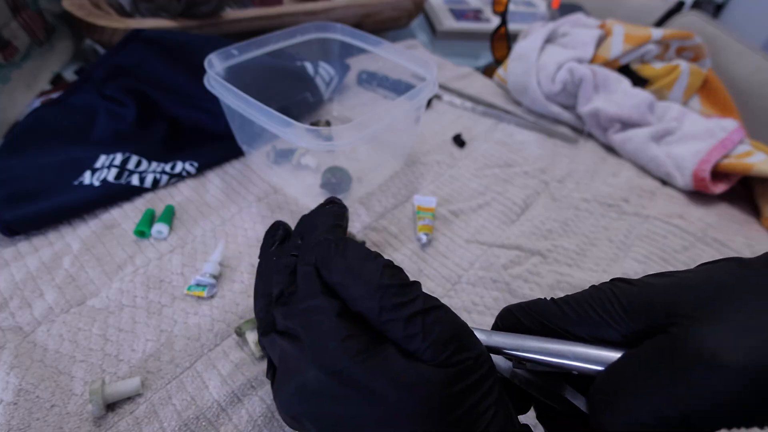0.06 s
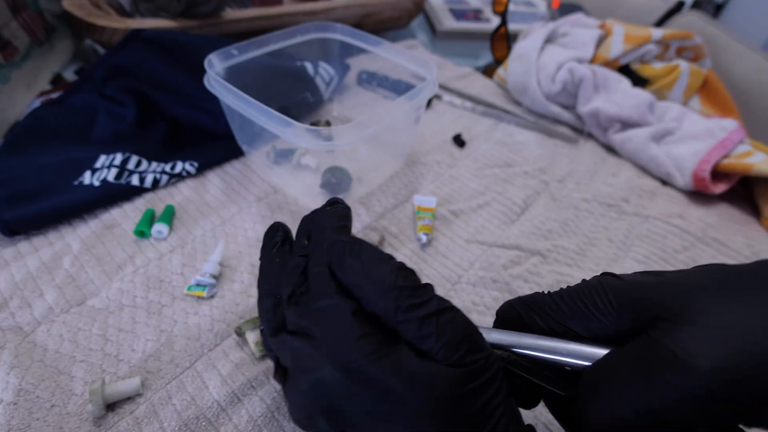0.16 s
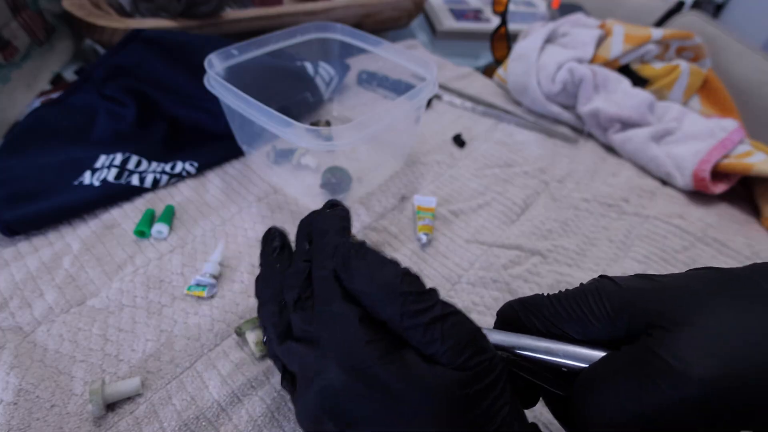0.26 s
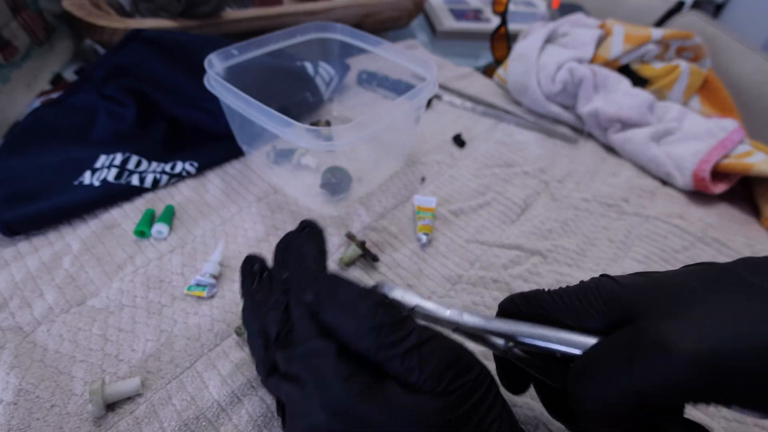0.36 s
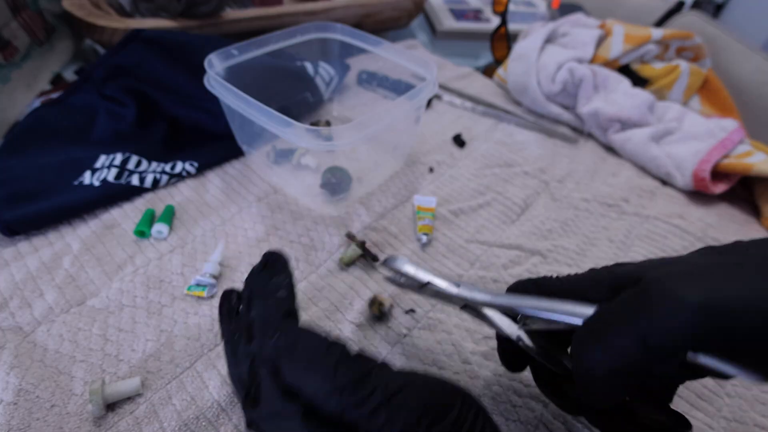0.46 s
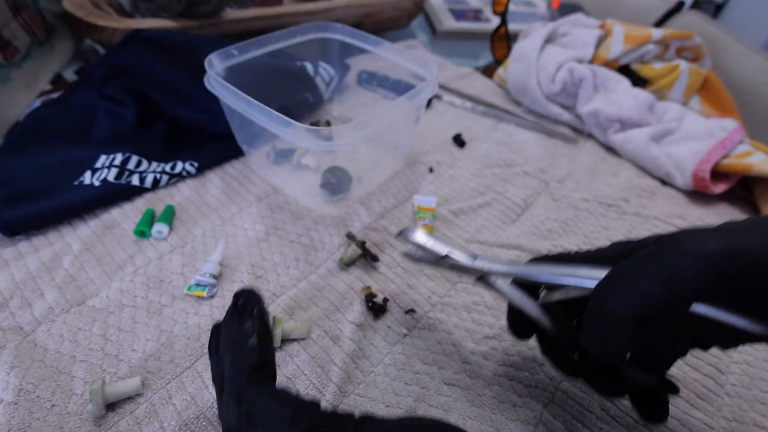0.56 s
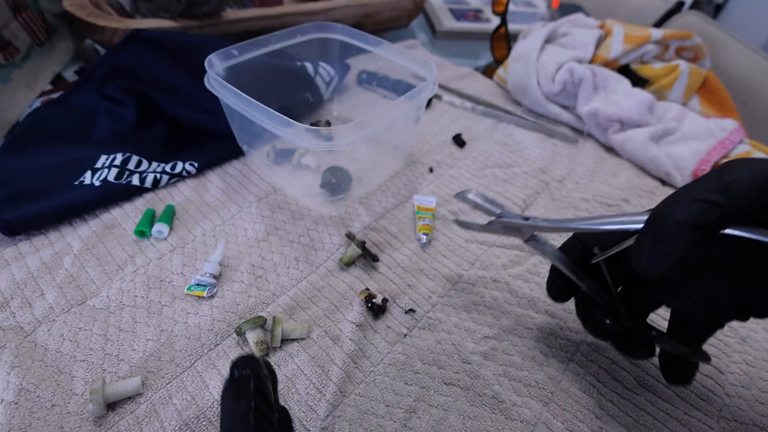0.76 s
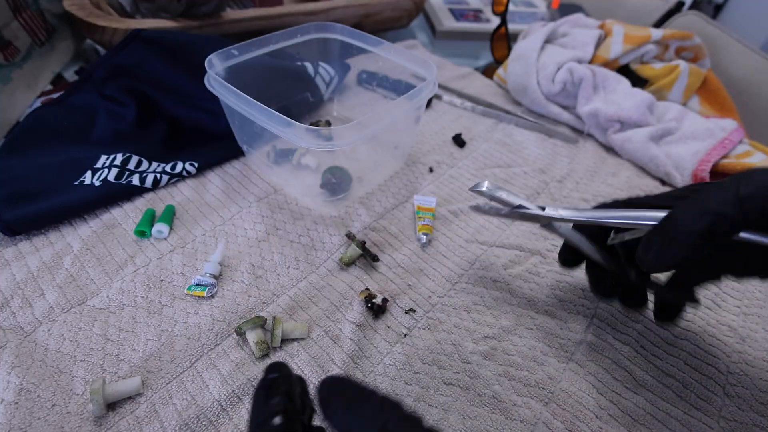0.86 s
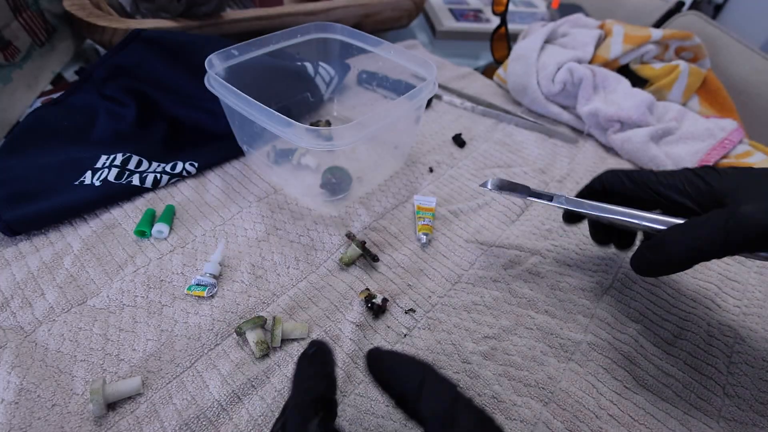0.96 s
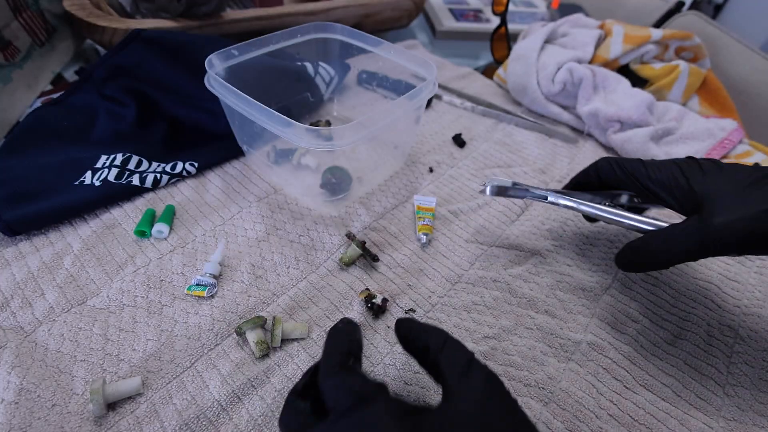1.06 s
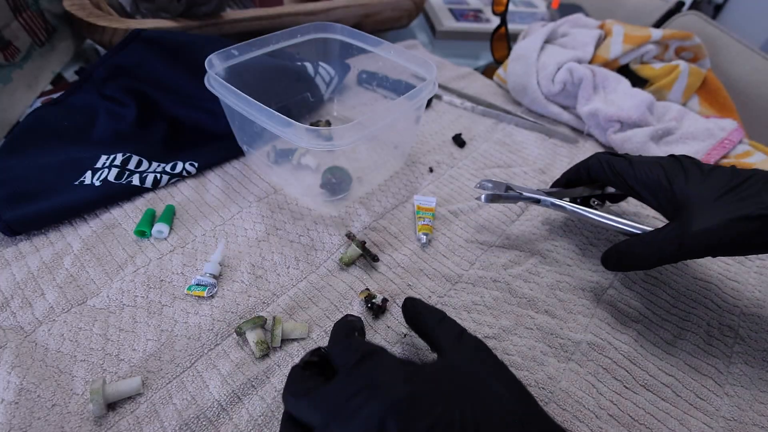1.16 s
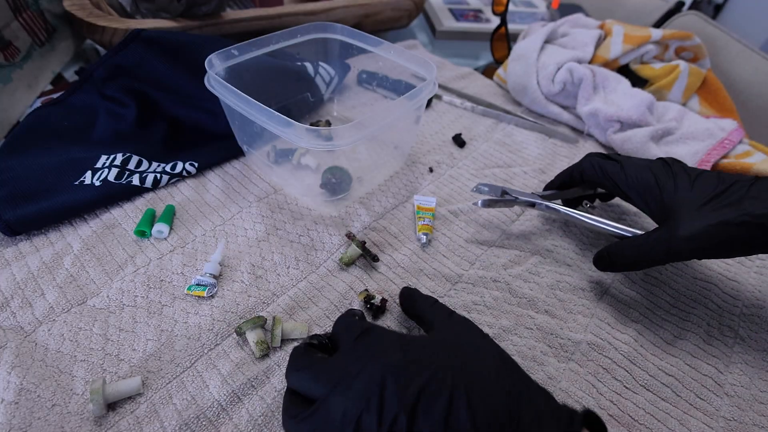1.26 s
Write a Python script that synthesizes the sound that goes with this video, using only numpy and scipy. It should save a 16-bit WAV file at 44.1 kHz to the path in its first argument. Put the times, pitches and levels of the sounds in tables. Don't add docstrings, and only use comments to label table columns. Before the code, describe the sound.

A single loud, brittle snap at 0.24 s: steel cutters split a small rock in a tight burst of gritty fractures, with a faint table thud, thin steely ringing and a short room answer. Before it, a faint tick at 0.04 s and soft rubbing. Jaws click at 0.44 s; tiny crumb and glove ticks, cloth rustle, a fading distant trickle and low room hum follow, with a last tick at 1.24 s.

```python
import sys
import numpy as np
from scipy import signal
from scipy.fft import rfft, irfft
from scipy.io import wavfile
from scipy.ndimage import uniform_filter1d

SR = 44100
rng = np.random.default_rng(int(sys.argv[2]) if len(sys.argv) > 2 else 0)


def to_wav(s):
    ch = np.atleast_2d(s).T
    pcm = np.round(np.clip(ch, -1, 1) * 32767)
    wavfile.write(sys.argv[1], SR, pcm.astype(np.int16))


def volts_from_decibels(level):
    exponent = np.asarray(level, float) / 20
    return 10 ** exponent


N = 57330
T = np.arange(N) / SR

# start in seconds, level in dB, extra treble above 6 kHz in dB.
FRACTURES = [
    (.2405, -16, -16),
    (.2422, -16, -4),
    (.2429, -15, -2),
    (.2442, -24, 0),
    (.2453, -24, 9),
    (.2466, -17, 2),
    (.2497, -35, 0),
    (.2533, -36, 0),
    (.2752, -39, 8),
]
# mode in Hz, level in dB, T60 in seconds.
STONE_MODES = [(1090, -12, .025), (1310, -8, .01), (1660, -5, .01), (1830, 1, .011), (2030, -7, .009),
               (2640, -3, .009), (3610, -12, .008), (3950, -9, .01), (4440, -5, .014), (5150, -5, .007),
               (7150, -14, .008), (7880, -7, .008), (8180, -8, .008), (9450, -8, .007)]
# centre in Hz, width in Hz.
STONE_GAPS = [(3150, 650), (6150, 500)]
# centre in Hz, width in Hz, level in dB, T60 in seconds.
HANDLE_BANDS = [(1090, 45, -59, .6), (2590, 170, -51, .6), (4050, 300, -57, .4), (5560, 250, -58, .35),
                (8150, 1100, -52, .25), (9800, 600, -65, .3), (12100, 900, -62, .25)]
# mode in Hz, level in dB, T60 in seconds.
TABLE_MODES = [(85, -49, 0.099), (165, -53.5, 0.16), (350, -49, 0.14), (530, -60.5, 0.014)]
# mode in Hz, level in dB, T60 in seconds.
JAW_MODES = [(2730, -55, .012), (3900, -50, .012), (5560, -47, .016), (6570, -58, .01), (7720, -46, .012),
             (9360, -48, .012), (12200, -60, .016)]
# start in seconds, level in dB, pitch in Hz, T60 in seconds.
TICKS = [(.0426, -51, 1750, .016), (.0430, -58, 3650, .016), (.0435, -60, 4450, .016),
         (.0432, -63, 9000, .012), (.276, -55, 330, .04), (.180, -65, 1800, .012), (.5015, -58, 1900, .012),
         (.502, -62, 4000, .012), (.5415, -58, 1950, .012), (.549, -60, 2100, .012),
         (.5855, -59, 1900, .012), (.607, -64, 2000, .01), (.619, -60, 2400, .014), (.620, -66, 4200, .014),
         (.680, -67, 2200, .01), (.757, -68, 5500, .006), (.806, -68, 7000, .008), (.878, -67, 10500, .008),
         (.921, -64, 6800, .012), (.938, -68, 9500, .012), (.945, -68, 5000, .008), (.965, -65, 6500, .012),
         (.969, -67, 5000, .012), (.966, -68, 3900, .012), (1.2388, -57, 2400, .012),
         (1.239, -67, 4800, .008), (1.239, -67, 8000, .008), (1.272, -66, 6800, .02)]
# time in seconds, pressure in dB.
RUB_PRESSURE = [(0, -80), (.042, -77), (.05, -64.5), (.13, -75), (.24, -75), (.3, -67), (.4, -74),
                (.6, -72.5), (.72, -78), (.745, -65.5), (.83, -68), (.93, -66), (1.0, -70), (1.1, -75.5),
                (1.2, -77.5), (1.29, -68.5)]
# centre in Hz, width in Hz, level in dB.
RUB_BANDS = [(153, 110, -1), (271, 96, 4), (360, 180, -3.5), (531, 100, -3.5), (680, 100, -9),
             (1090, 200, -21), (81, 40, -13.5)]
# time in seconds, level in dB.
RUSTLE_LEVEL = [(0, -114.5), (.04, -105), (.05, -77), (.1, -116), (.205, -116), (.22, -76.5), (.45, -78),
                (.55, -84), (.7, -86), (.8, -86.5), (.96, -77), (1.1, -87), (1.2, -90), (1.27, -83.5)]
# time in seconds, level in dB.
TRICKLE_LEVEL = [(0, -73), (.04, -94), (.06, -71), (.2, -77), (.5, -70), (.68, -77), (.72, -78.5),
                 (1.3, -92)]
# time in seconds, level in dB.
ROOM_CAUSES = [
    (.0426, -27),
    (.2405, 0),
    (.4375, -28),
    (1.2388, -34),
]
# frequency in Hz, level in dB, T60 in seconds.
ROOM_TAIL = [(300, -65, .4), (880, -64, .35), (1200, -56.5, 0.35), (2400, -55, 0.59), (3140, -65, .4),
             (4470, -54.5, 0.6), (6660, -64, 0.44), (14000, -68, 0.25)]
# frequency in Hz, density in dB per Hz.
HUM_SPECTRUM = [(18, -49), (30, -16.5), (327, 6), (888, -1.5), (1420, 0.5), (2230, -12.5), (4520, -26),
                (11300, -27), (16000, -39)]

RISE_S = .0002
CRACK_S = FRACTURES[0][0]
THUD_S = FRACTURES[1][0]
JAWS_S = .4374
SNAP_PEAK = .3
STONE_SCATTER_DB, STONE_DETUNE, STONE_LOW_HZ = 2, .01, 1000
GRIT_DB, GRIT_T60_S, GRIT_HZ = -26, 0.011, 12120
TICK_SPREAD, TICK_DB = .045, -2
RUSTLE_HZ, RUSTLE_WIDTH_HZ, RUSTLE_GRAIN_DB = 7000, 7600, 1.2
TRICKLE_HZ, TRICKLE_WIDTH_HZ = 1490, 1200
ROOM_DELAY_S, ROOM_RISE_S = .006, .003
EARLY_DB, EARLY_T60_S = 9.5, 0.049
TICK_ROOM_DB, TICK_ROOM_T60_S = -40, .12
HUM_DB = -75
LOUD_UNTIL_S, LOUD_FADE_S = .39, .072
QUIET_TOP_HZ, HUM_TOP_HZ = 12700, 9500
MIC_LOW_HZ = 57


def curve(table, x, col=1, log=False):
    a = np.array(table, float)
    if log:
        return np.interp(np.log(x), np.log(a[:, 0]), a[:, col])
    return np.interp(x, a[:, 0], a[:, col])


def ring(start_s, hz, db, t60_s):
    t = np.maximum(T - start_s, 0)
    decay = np.exp(-np.log(1000) * t / max(t60_s, .002))
    push = 1 - np.exp(-(t / RISE_S) ** 2)
    return volts_from_decibels(db) * np.sin(2 * np.pi * hz * t) * decay * push


def band(hz, width_hz):
    f = np.arange(N // 2 + 1) * SR / N + 1e-9
    resonance = 1 / (1 + ((f - hz * hz / f) / width_hz) ** 2)
    y = irfft(rfft(rng.standard_normal(N)) * resonance, N)
    return y / y.std()


def walk(rate_hz):
    k = int(SR / rate_hz)
    w = uniform_filter1d(uniform_filter1d(rng.standard_normal(N), k), k)
    return w / w.std()


def snap():
    out = 0
    grit = band(GRIT_HZ, 6000)
    chance = rng.standard_normal((len(FRACTURES), len(STONE_MODES), 2))
    for (start_s, db, treble_db), luck in zip(FRACTURES, chance):
        for (hz, mode_db, t60_s), (a, b) in zip(STONE_MODES, luck):
            level_db = db - 2.5 + mode_db + treble_db * (hz > 6000) + STONE_SCATTER_DB * a
            out = out + np.sign(b) * ring(start_s, hz * (1 + STONE_DETUNE * b), level_db, t60_s)
        fall_db = 60 * np.maximum(T - start_s, 0) / GRIT_T60_S
        out = out + grit * (T > start_s) * volts_from_decibels(db + treble_db + GRIT_DB - fall_db)
    for hz, width_hz in STONE_GAPS:
        out = signal.lfilter(*signal.iirnotch(hz, hz / width_hz, SR), out)
    out = signal.sosfilt(signal.butter(6, STONE_LOW_HZ, "high", fs=SR, output="sos"), out)
    return out * SNAP_PEAK / np.abs(out).max()


def steel():
    t = T - THUD_S
    out = sum(ring(THUD_S, *mode) for mode in TABLE_MODES)
    for hz, width_hz, db, t60_s in HANDLE_BANDS:
        out = out + band(hz, width_hz) * volts_from_decibels(db - 60 * np.maximum(t, 0) / t60_s) * (t > 0)
    return out


def ticks():
    out = sum(ring(JAWS_S, *mode) for mode in JAW_MODES)
    for (start_s, db, hz, t60_s), luck in zip(TICKS, rng.standard_normal((len(TICKS), 3))):
        for step, c in zip((-1, 0, 1), luck):
            mode_hz = hz * (1 + TICK_SPREAD * (step + c / 3))
            out = out + ring(start_s, mode_hz, db + TICK_DB - 5 * abs(step), t60_s)
    return out


def hands():
    low = sum(volts_from_decibels(db + 0.5 * walk(23)) * band(hz, width_hz) for hz, width_hz, db in RUB_BANDS)
    rub = low * volts_from_decibels(curve(RUB_PRESSURE, T) - 3)
    grains = volts_from_decibels(RUSTLE_GRAIN_DB * walk(300))
    return rub + band(RUSTLE_HZ, RUSTLE_WIDTH_HZ) * grains * volts_from_decibels(curve(RUSTLE_LEVEL, T))


def room():
    out = 0
    for hz in 200 * 2 ** np.arange(0, 6.3, 1 / 3):
        t60_s = curve(ROOM_TAIL, hz, col=2, log=True)
        fade = 0
        for start_s, db in ROOM_CAUSES:
            t = np.maximum(T - start_s - ROOM_DELAY_S, 0)
            tail = volts_from_decibels(-60 * t / t60_s)
            early = volts_from_decibels(EARLY_DB - 60 * t / EARLY_T60_S)
            fade = fade + volts_from_decibels(db) * np.minimum(t / ROOM_RISE_S, 1) * (tail + early)
        out = out + band(hz, hz / 4) * volts_from_decibels(curve(ROOM_TAIL, hz, log=True)) * fade
    return out


def echo(x):
    fade = volts_from_decibels(TICK_ROOM_DB - 60 * T / TICK_ROOM_T60_S) * (T > ROOM_DELAY_S)
    return signal.fftconvolve(x, rng.standard_normal(N) * fade)[:N]


def trickle():
    return band(TRICKLE_HZ, TRICKLE_WIDTH_HZ) * volts_from_decibels(curve(TRICKLE_LEVEL, T) + 0.5 * walk(100))


def hum():
    out = 0
    for hz in 35 * 2 ** np.arange(0, 9, .5):
        level_db = curve(HUM_SPECTRUM, hz, log=True) + 10 * np.log10(hz)
        out = out + volts_from_decibels(level_db + 2.5 * walk(6)) * band(hz, hz / 0.86)
    return out / out.std() * volts_from_decibels(HUM_DB)


def dull(x, top_hz):
    return signal.sosfilt(signal.ellip(8, .5, 60, top_hz, fs=SR, output="sos"), x)


def scene():
    small = ticks()
    back = room()
    loud = (T > CRACK_S) * np.clip((LOUD_UNTIL_S - T) / LOUD_FADE_S, 0, 1)
    quiet = small + echo(small) + hands() + trickle() + back * (1 - loud)
    mix = snap() + steel() + back * loud + dull(quiet, QUIET_TOP_HZ) + dull(hum(), HUM_TOP_HZ)
    return mix[None]


def roll_off(x):
    return signal.sosfilt(signal.butter(12, 16100, fs=SR, output="sos"), x)


def record(dry):
    mix = signal.sosfilt(signal.butter(2, MIC_LOW_HZ, "high", fs=SR, output="sos"), dry)
    return roll_off(mix)


dry = scene()
out = record(dry)
to_wav(out)
```